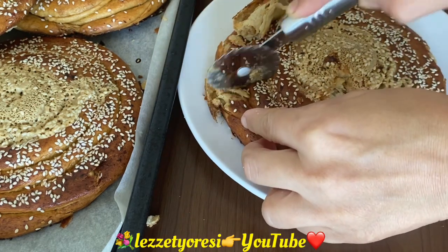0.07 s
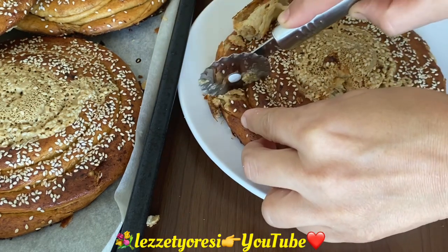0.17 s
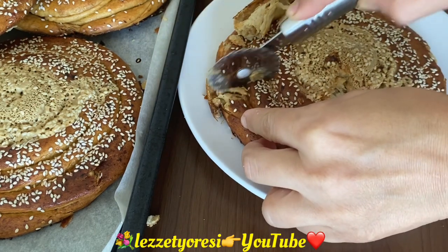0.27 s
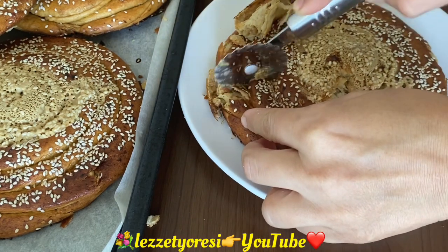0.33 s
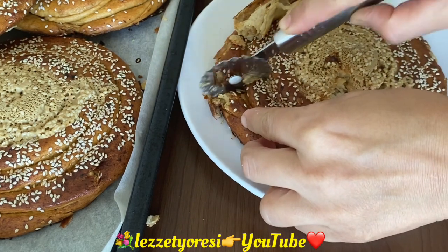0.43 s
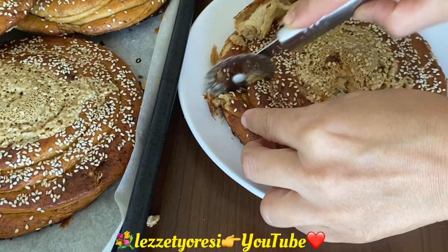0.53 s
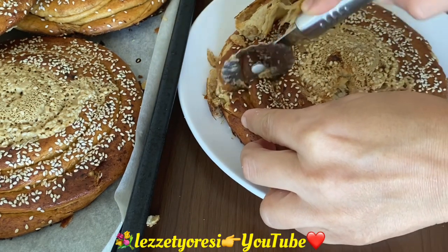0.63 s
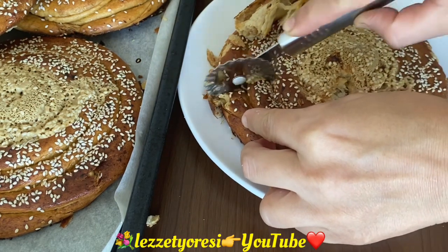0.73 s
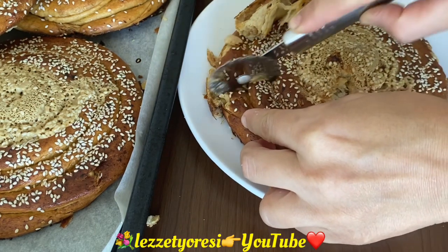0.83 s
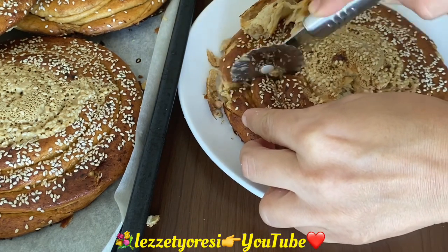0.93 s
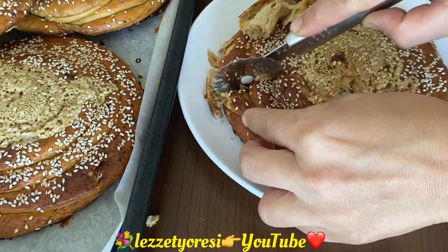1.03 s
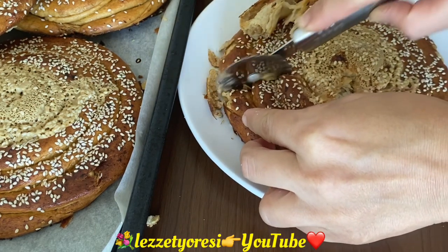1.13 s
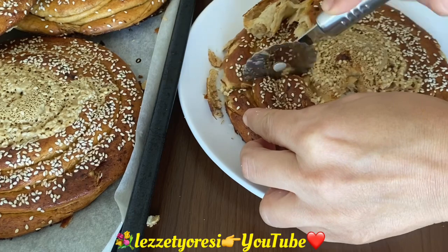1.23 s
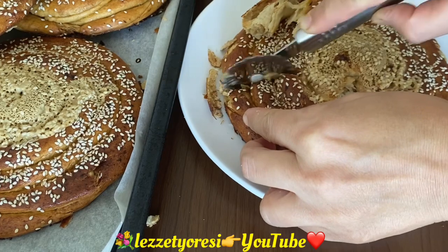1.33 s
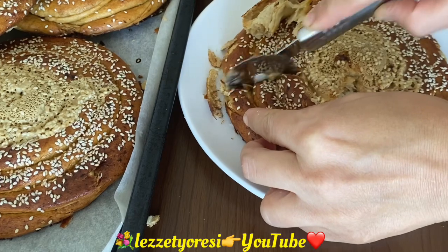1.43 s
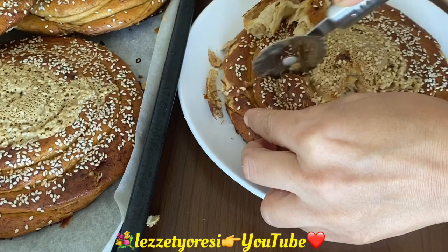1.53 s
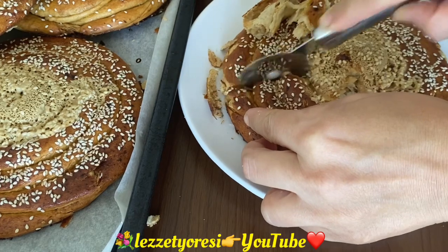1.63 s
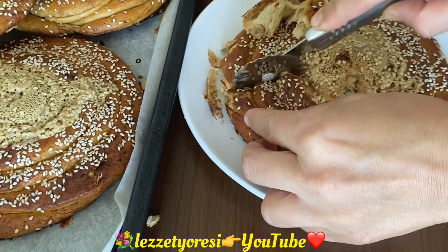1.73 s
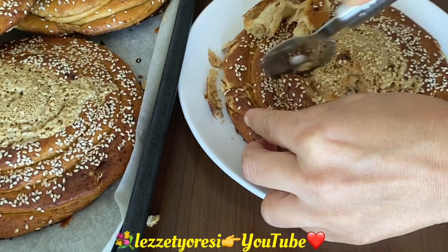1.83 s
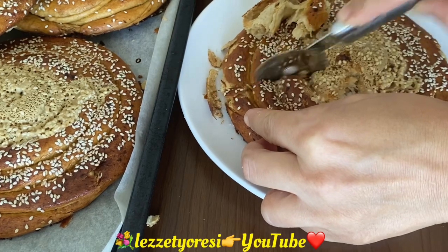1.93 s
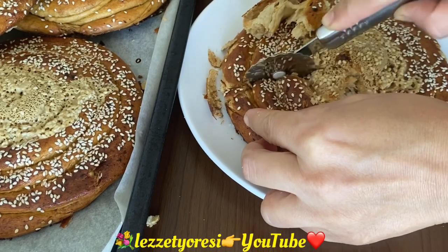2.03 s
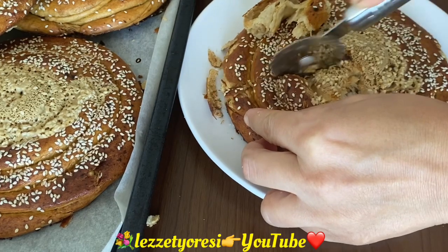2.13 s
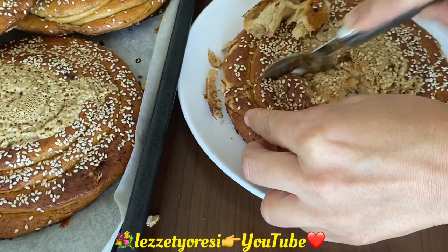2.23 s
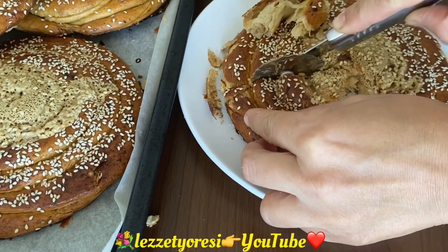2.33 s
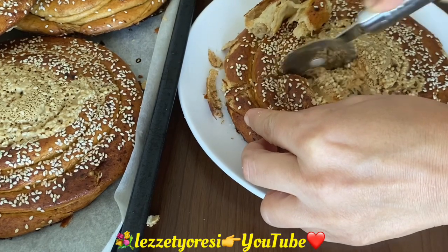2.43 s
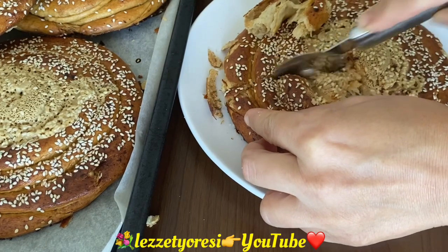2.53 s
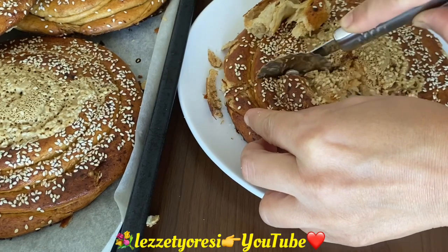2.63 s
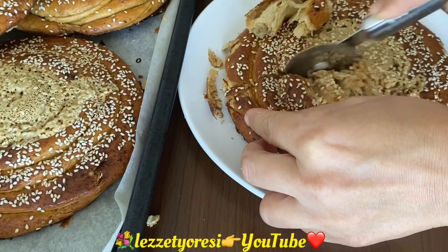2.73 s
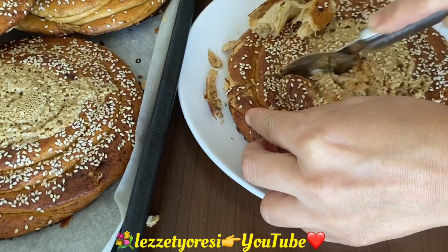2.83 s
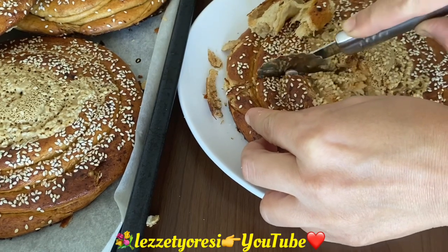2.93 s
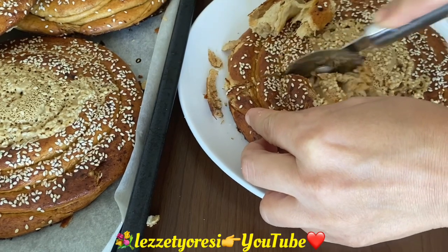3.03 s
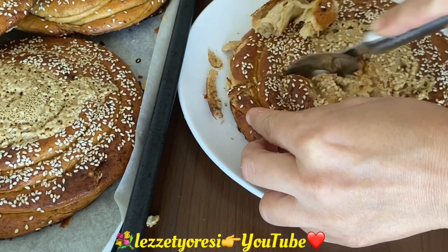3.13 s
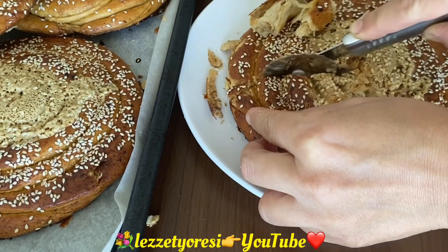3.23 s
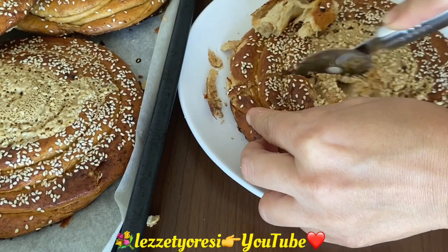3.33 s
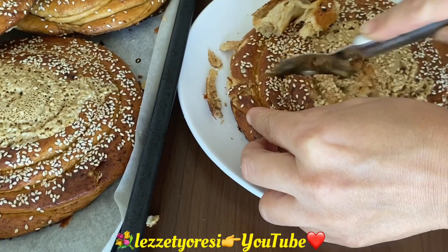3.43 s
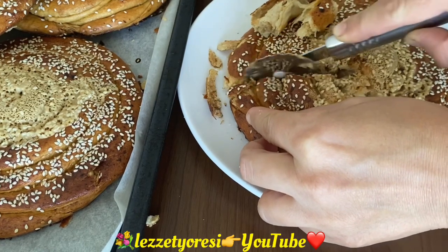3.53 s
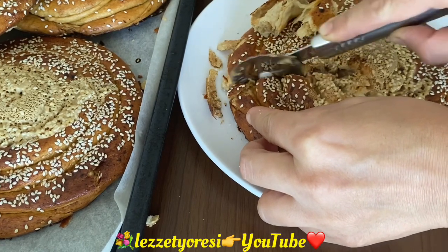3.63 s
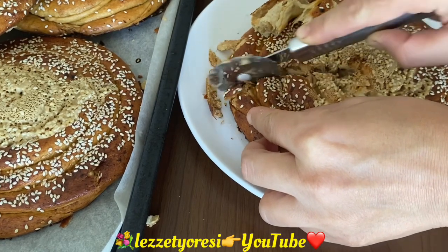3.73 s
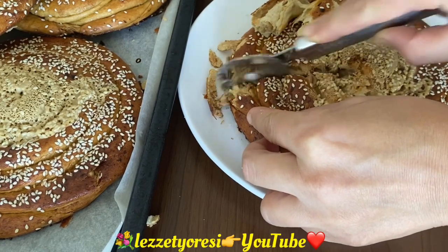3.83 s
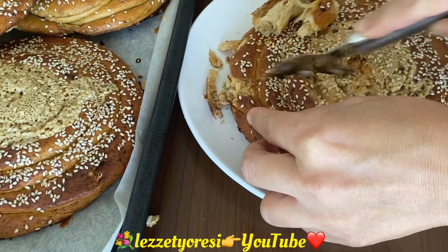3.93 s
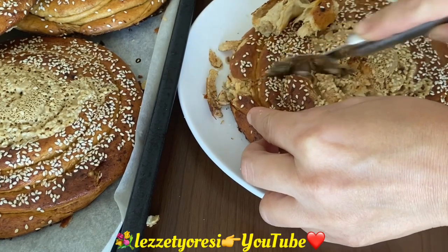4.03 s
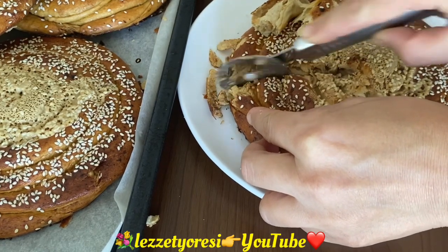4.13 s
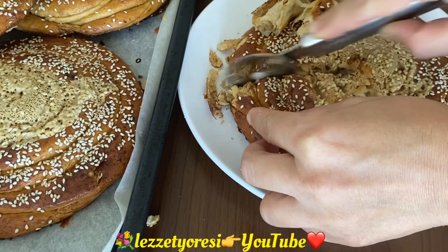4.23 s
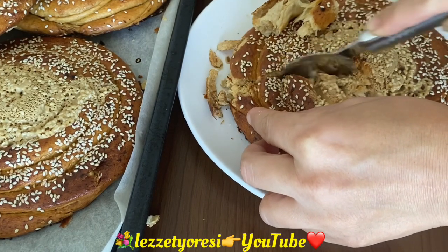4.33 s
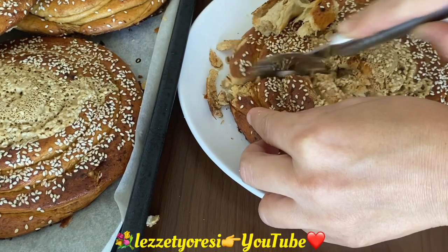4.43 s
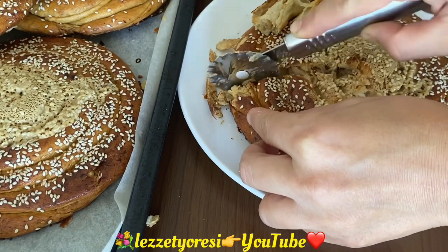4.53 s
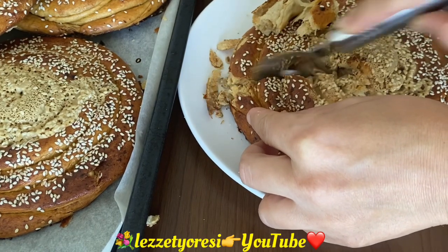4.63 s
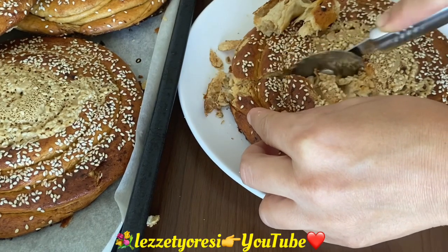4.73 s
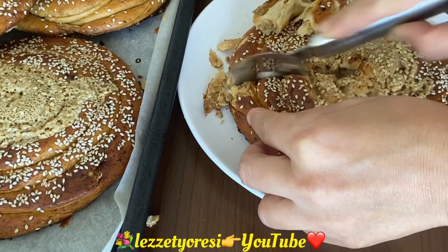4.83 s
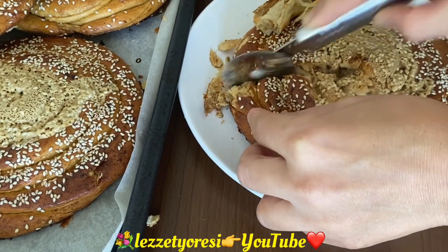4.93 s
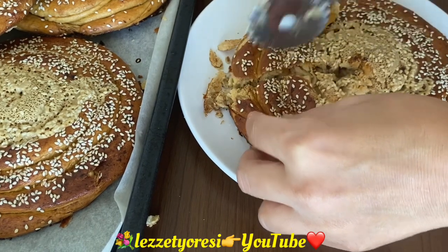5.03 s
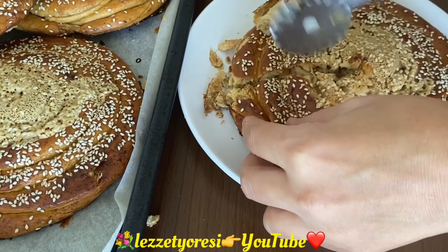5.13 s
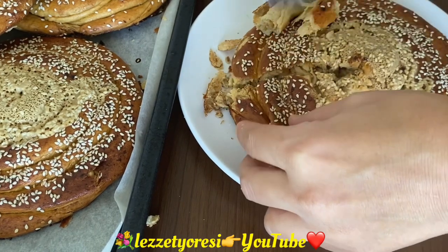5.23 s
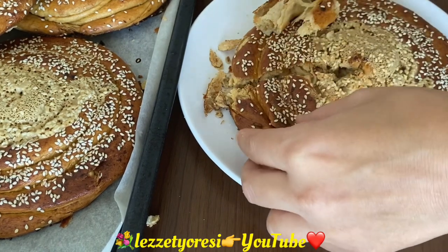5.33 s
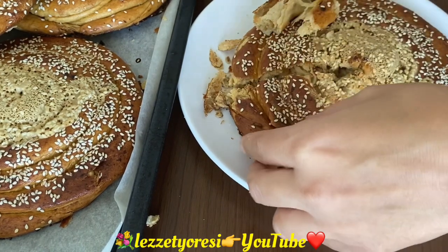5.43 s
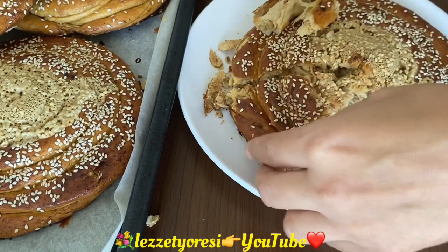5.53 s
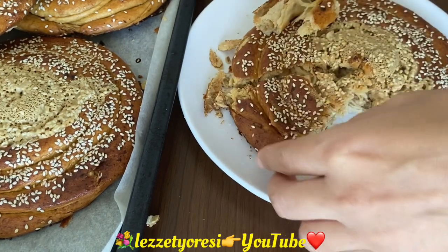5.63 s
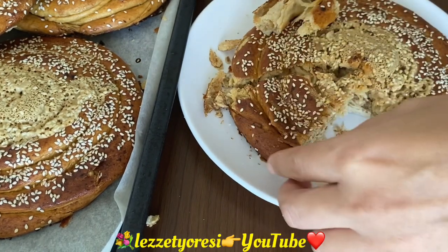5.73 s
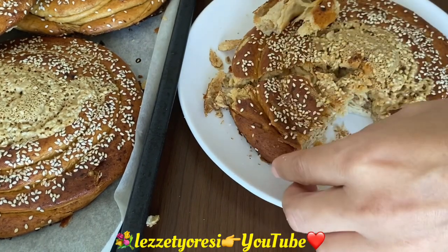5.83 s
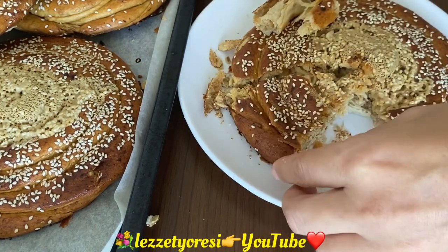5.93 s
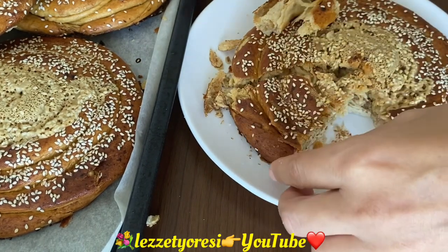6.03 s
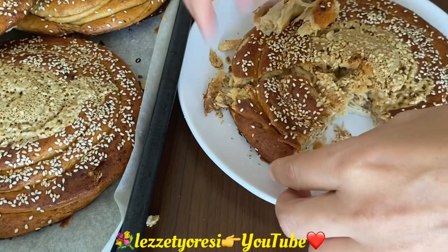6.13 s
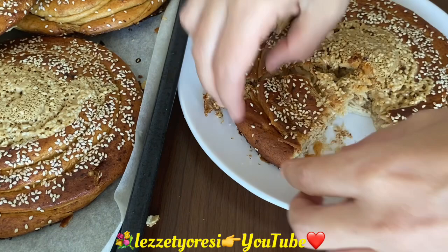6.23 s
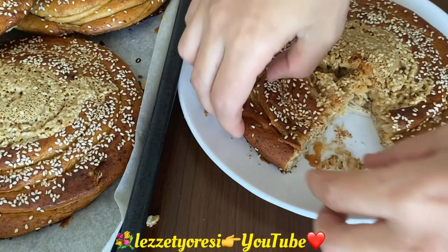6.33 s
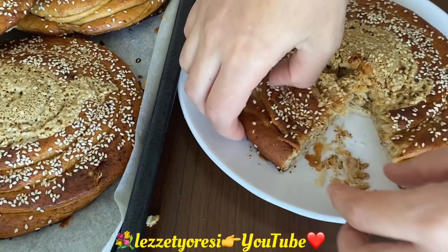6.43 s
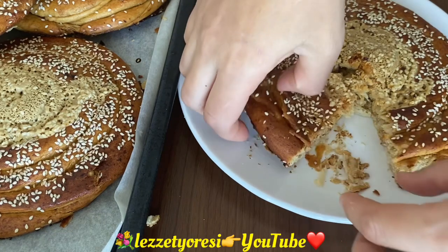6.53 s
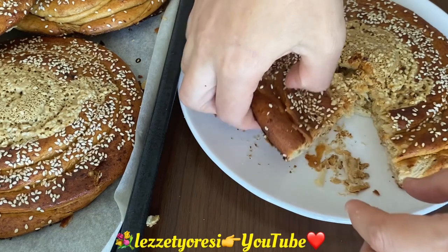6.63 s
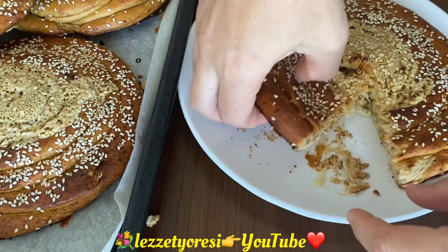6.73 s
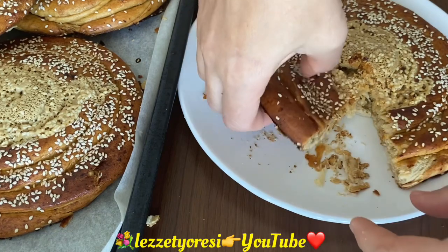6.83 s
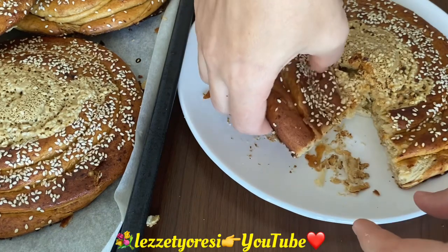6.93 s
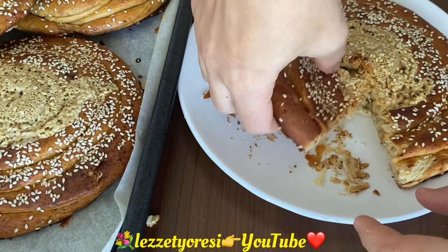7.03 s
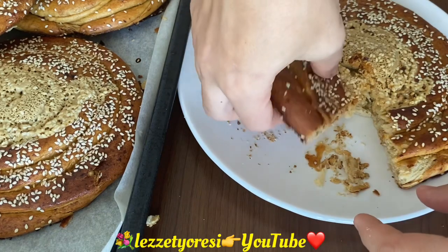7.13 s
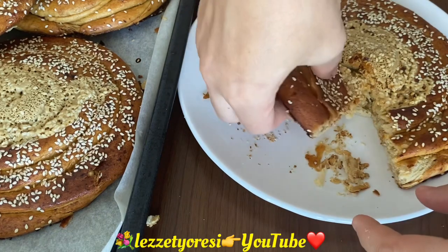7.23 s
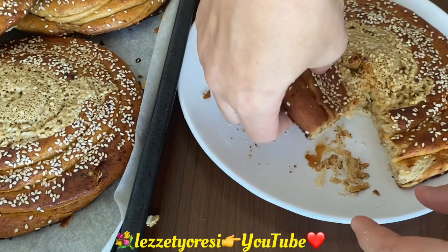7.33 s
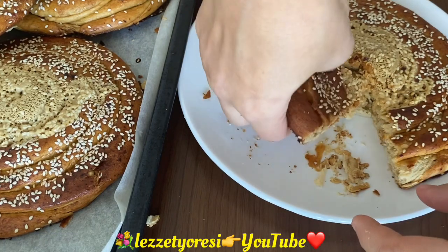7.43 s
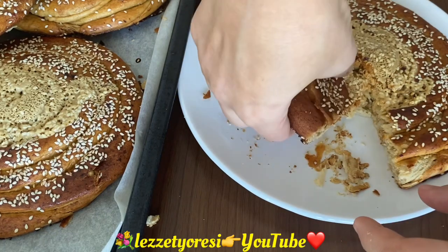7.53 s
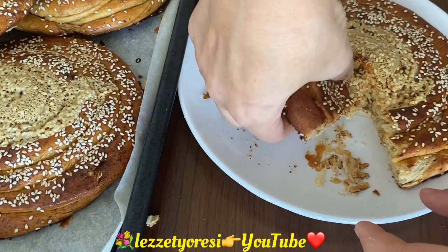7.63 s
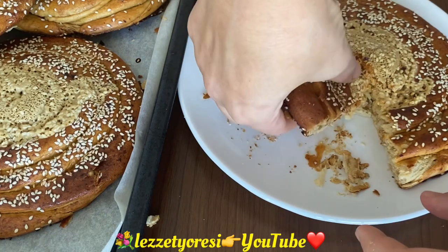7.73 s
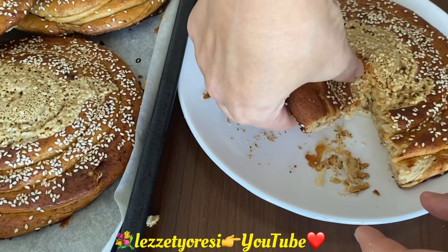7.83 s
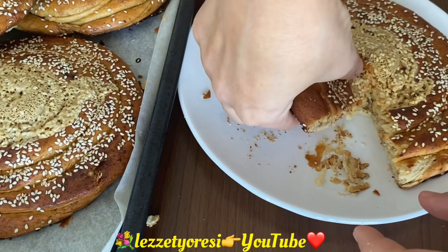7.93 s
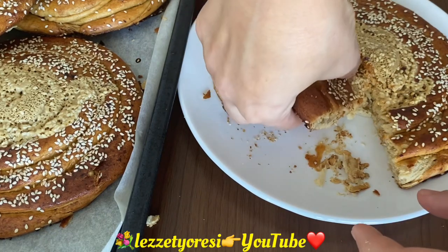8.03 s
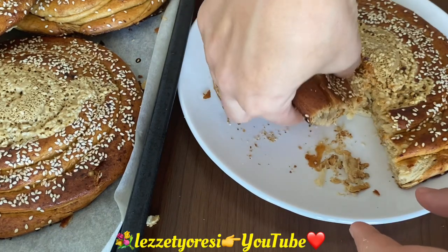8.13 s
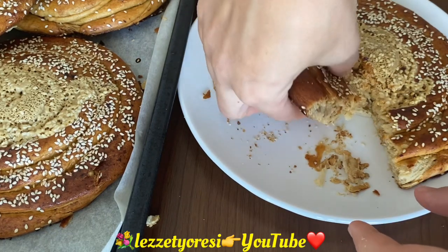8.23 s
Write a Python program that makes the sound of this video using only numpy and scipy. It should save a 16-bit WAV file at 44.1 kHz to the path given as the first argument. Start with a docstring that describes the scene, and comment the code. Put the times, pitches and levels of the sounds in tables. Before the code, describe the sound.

Close, brittle crunching as a steel cutter works through flaky baked crust on ceramic, ending with a heavy plate bump and tiny clinks.

```python
"""A steel cutting wheel saws through the crisp crust of a pastry on a ceramic plate and strikes the plate,
then is put down; the plate bumps the table and fingers lift a piece with small clinks.
Random breaks and short puffs of noise make the crust, and ring the resonances of plate and wheel.
Throughout, table thumps and a far rumble, beating hums and kitchen air lie behind the close sound,
at a pair of microphone ports."""
import sys
import numpy as np
from scipy import signal
from scipy.fft import rfft, irfft, next_fast_len
from scipy.io import wavfile
from scipy.ndimage import uniform_filter1d, map_coordinates

SR = 44100
rng = np.random.default_rng(int(sys.argv[2]) if len(sys.argv) > 2 else 0)


def store_pcm(level_fs):
    """Save levels as 16-bit WAV."""
    pcm = np.round(np.clip(level_fs, -1, 1) * 32767).astype(np.int16)
    wavfile.write(sys.argv[1], SR, np.atleast_2d(pcm).T)


N = 364701  # length [samples]

# modes of the plate on its table: (frequency [Hz], level [dB], t60 [s])
PLATE_MODES = [(330, 7.5, 0.034), (640, 3.5, 0.021), (797, 4, 0.03), (1312, 3, 0.024), (1510, -2.5, 0.027),
               (1743, 1, 0.084), (1933, -7, 0.028), (2680, -0.5, 0.024), (2940, -9.5, 0.013),
               (4640, -7, 0.022)]
# resonance of the steel disc: (frequency [Hz], width [Hz])
WHEEL_RESONANCE = (3650, 240)
# how much of the crackle rings on: (time [s], plate level [dB], wheel level [dB])
RINGING_LEVELS = [(0, -7.5, -71), (1.5, -10.5, -11.5), (2.75, -12, 1), (3, -0.5, -9), (4.2, -2, -9.5),
                  (4.9, 3.5, -12), (4.99, -13, -2.5), (5.85, 0, 1), (5.92, -7, -36), (6.9, -20.5, -25)]


def crust():
    """Dense breaking flakes are heard in the air, through plate and wheel, and as a low grinding."""
    # tilt of the flakes' spectrum: (frequency [Hz], level [dB per Hz])
    flake_spectrum = [(1500, -17.5), (2550, -9.5), (5750, -8.5), (7750, -3.5), (9900, 0), (10800, -56.5)]
    sizes = 6
    large = sizes // 2 + 1  # the first rows are the larger flakes
    sparkle_db, sparkle_fades = -5.5, 0.37  # smallest flakes over larger; dB lost per dB of plate ring
    low_modes_db = 9  # the plate's low modes over its high ones
    grind_s = 0.11  # the low grinding follows the strokes slowly

    stroke = crust_strokes()
    ring_db, wheel_db = curves(RINGING_LEVELS)
    breaks = grains(count=30000, spread_db=0.5, clump_db=3.0, kinds=sizes)
    pitch = np.geomspace(1500, 9300, sizes)[:, None]  # the smaller the flake, the higher it snaps [Hz]

    def flake_colour(f):
        tilt = amp(along(flake_spectrum, f)) * np.sqrt(3000 / pitch)
        return tilt * peak(f, pitch, 0.6 * pitch) ** 2

    flakes = filtered(breaks, flake_colour)
    sparkle = amp(sparkle_db - sparkle_fades * ring_db) * unit(flakes[large:].sum(0))
    crackle = unit(flakes[:large].sum(0)) + sparkle + unit(big_flakes(pitch))

    ring = unit(filtered(breaks[1] + breaks[0], lambda f: plate(f) * (f > 1900)))
    wheel = unit(filtered(breaks[2], lambda f: peak(f, *WHEEL_RESONANCE)))
    low_colour = lambda f: (plate(f) + 0.64 * peak(f, 970, 500)) * (f < 1900)
    crunch = unit(filtered(breaks[0], low_colour))

    slow_stroke = abs(uniform_filter1d(stroke, round(grind_s * SR)))
    grind = np.sqrt(stroke * slow_stroke)
    bright = crackle + amp(ring_db) * ring + amp(wheel_db) * wheel
    return stroke * bright + grind * amp(ring_db + low_modes_db) * crunch


def crust_strokes():
    """The crackle swells with wheel strokes and finger grips over steadily settling crumbs."""
    # strokes through the crust, and the piece dragged free: (peak time [s], crackle level [dB], fall [s])
    wheel_strokes = [(0.0, -59.5, 0.25), (0.147, -53.5, 0.08), (0.332, -60, 0.045), (0.431, -55.5, 0.13),
                     (0.612, -57.5, 0.13), (0.728, -52.5, 0.11), (0.915, -58, 0.31), (1.049, -53, 0.068),
                     (1.206, -59.5, 0.26), (1.381, -50, 0.039), (1.502, -57.5, 0.2), (1.669, -58, 0.17),
                     (1.867, -59, 0.058), (1.981, -57.5, 0.1), (2.156, -62, 0.2), (2.28, -54.5, 0.057),
                     (2.441, -64.5, 0.48), (2.563, -63, 0.18), (2.78, -61.5, 0.16), (2.947, -51, 0.038),
                     (3.047, -64.5, 0.28), (3.245, -49.5, 0.046), (3.328, -47.5, 0.022),
                     (3.518, -51.5, 0.065), (3.63, -61, 0.15), (3.724, -63, 0.3), (3.931, -52, 0.14),
                     (4.139, -52.5, 0.11), (4.312, -61, 0.22), (4.44, -62, 0.15), (4.531, -53, 0.069),
                     (4.641, -58.5, 0.22), (4.872, -53, 0.096), (5.205, -69.5, 0.23), (5.771, -67.5, 0.41),
                     (5.93, -57.5, 0.31)]
    # grips of the fingers on the piece: (peak time [s], crackle level [dB], fall [s])
    finger_grips = [(6.67, -73.5, 0.075), (6.739, -71.5, 0.036), (6.785, -69.5, 0.027), (6.912, -70, 0.066),
                    (7.135, -66, 0.074), (7.35, -78, 0.08), (7.69, -88, 0.073), (7.875, -87, 0.038),
                    (7.95, -86, 0.084)]
    settle_db = -91
    strokes = swells(wheel_strokes, rise_s=0.077, abrupt=0.05)
    return strokes + swells(finger_grips, rise_s=0.026) + amp(settle_db)


def big_flakes(pitch):
    """The few big flakes each make a short noise burst of their own colour."""
    burst_t60 = 0.007  # [s]
    ticks = grains(count=2200, spread_db=3, clump_db=2.5, kinds=len(pitch))
    decay = amp(-60 / burst_t60 / SR)
    envelope = signal.lfilter([1], [1, -decay], abs(ticks))
    bursts = envelope * rng.standard_normal(ticks.shape)
    return filtered(bursts, lambda f: peak(f, pitch, 0.6 * pitch) ** 3).sum(0)


def snaps():
    """Each crack is a short puff: a body that rings the nearby modes, a treble spit and a low-mode knock."""
    # single cracks and contacts; treble and knock are relative to the body:
    # (time [s], peak level [dB], body [Hz], treble level [dB], knock level [dB])
    cracks = [(0.1165, -43.5, 3080, 7, -2), (0.1503, -41.5, 2210, 0, -17), (0.409, -40, 1290, 7.5, -25),
              (0.428, -33, 1160, -4.5, -22), (0.4338, -30.5, 1914, -2, -3.5), (0.445, -41, 3300, -4, -30),
              (0.696, -44, 2900, -12, -18), (1.3482, -38, 3130, -18, -3), (1.6602, -34, 3270, -1, -6),
              (1.679, -38, 3400, 0.5, -17), (1.829, -42.5, 3440, -5, -25), (1.9708, -31.5, 3200, 8.5, -7.5),
              (1.9909, -35, 2420, -6, -31), (2.2409, -40.5, 1110, -4.5, -8), (2.4456, -41, 3670, -8, -2.5),
              (2.606, -38.5, 2400, -10.5, -5), (2.914, -41.5, 1530, -18, 4.5),
              (3.032, -39.5, 1440, -4.5, -13), (3.203, -48, 1470, -18, 10.5), (3.2397, -33, 2240, -2.5, -6),
              (3.46, -30.5, 2400, -7.5, 2.5), (3.496, -26, 2270, -8, -14), (3.9797, -29, 1580, -45, -3.5),
              (4.0822, -26, 2590, -12, -6.5), (4.2721, -33.5, 1870, -39, -1), (4.348, -36, 2770, -10, -6),
              (4.373, -36.5, 1532, -23, -3), (4.393, -27.5, 2660, -7, -5), (4.4341, -32, 2540, -3, -3.5),
              (4.461, -32.5, 1596, -21.5, -23), (4.482, -27.5, 2840, -13.5, -3.5),
              (4.5365, -29, 2640, -21, -33), (4.556, -30, 2730, -28.5, -1.5),
              (4.628, -21, 2945, -14.5, -7.5), (4.819, -39, 2760, -10, -0.5), (4.8561, -31.5, 2665, -25, 0),
              (4.876, -34, 2670, -25, 4), (4.9125, -33, 2630, -25.5, -14),
              (4.94, -40.5, 4540, -11.5, -30.5), (4.991, -40, 3670, -8.5, -30.5),
              (4.9992, -20.5, 2880, -9, -19), (5.143, -33.5, 2220, -4, -25), (5.1921, -30, 2134, 10, -18.5),
              (5.4332, -51, 3300, -20, -23.5), (5.4825, -38, 3290, -31, -18),
              (5.761, -35, 3285, -30.5, -8.5), (5.9379, -27, 4610, 6, -27), (6.118, -45, 3370, -2.5, -28.5),
              (6.76, -45.5, 362, -43.5, -11)]
    echo_s, echo = 0.00187, 0.6  # each crack comes again off the nearest hard surface
    # each crack rings the modes at new levels and slightly other pitches
    scatter_db, pitch_scatter = 4, 0.012

    out, t = np.zeros(N + SR), np.arange(SR // 4) / SR
    top = lambda x: x / abs(x).max()
    ring_db, wheel_db = curves(RINGING_LEVELS)
    for s, db, hz, treble_db, knock_db in cracks:
        at = round(s * SR)
        blow, spit = rng.standard_normal((2, len(t))) * amp(-60 * t / [[0.006], [0.012]])
        blow[0] = 5  # the break itself is one sharp push
        blow[round(echo_s * SR)] += echo * blow[0]

        chance = rng.standard_normal((2, len(PLATE_MODES), 1))
        shift = 1 + pitch_scatter * chance[1]
        struck = lambda f: modes(f, PLATE_MODES, scatter_db * chance[0], shift)
        nearby = lambda f: peak(f, 1.24 * hz, 0.78 * hz) * struck(f) * (f > 0.7 * hz)

        puff = filtered(blow, lambda f: peak(f, hz, 0.57 * hz) ** 2)
        ring = filtered(blow, nearby)
        wheel = filtered(puff, lambda f: peak(f, *WHEEL_RESONANCE))
        treble = filtered(spit, lambda f: peak(f, 6850, 4800) ** 2)
        knock = filtered(blow, lambda f: struck(f) * peak(f, 838, 1700) ** 2)

        body = top(puff) + amp(-2.5 + 1.3 * ring_db[at]) * top(ring)
        body = body + amp(wheel_db[at] - 8.0) * top(wheel)
        sound = top(body) + amp(treble_db) * top(treble) + amp(knock_db) * top(knock)
        out[at:][:len(t)] += amp(db) * sound
    return out[:N]


def plate(f):
    """The plate at rest answers with the sum of its modes."""
    return modes(f, PLATE_MODES)


def bump():
    """The tipped plate bumps the table: one heavy contact and its rebound ring the table top."""
    # modes of the table top under the plate's rim: (frequency [Hz], level [dB], t60 [s])
    rim_modes = [(358, 18, 0.089), (623, -7.5, 0.053), (919, 2, 0.032), (1430, 1, 0.011), (1860, -1, 0.014),
                 (3000, -15.5, 0.017)]
    bump_s, bump_db = 5.9208, -11
    push_t60 = 0.0012  # [s]
    rebound_s, rebound = 0.0014, 1.7  # the rim lands a second time, harder

    out, t = np.zeros(N), np.arange(SR // 4) / SR
    push = 0.3 * rng.standard_normal(len(t)) * amp(-60 * t / push_t60)
    push[[0, round(rebound_s * SR)]] = 1, rebound
    knock = filtered(push, lambda f: modes(f, rim_modes) * peak(f, 1700, 4100))
    out[round(bump_s * SR):][:len(t)] = amp(bump_db) * knock / abs(knock).max()
    return out


def pings():
    """A thin decaying tone rings on after an early crack, perhaps the wheel's handle."""
    # onsets: (time [s], level [dB])
    ping_hits = [(0.148, -45.5)]
    # the tone: (frequency [Hz], level [dB], t60 [s])
    ping_modes = [(1665, 0, .17)]
    return tones(ping_hits, ping_modes)


def clinks():
    """The plate clinks under the lifted piece, as short pairs of decaying tones."""
    # onsets: (time [s], level [dB])
    clink_hits = [(6.785, -54), (7.166, -52.5), (7.187, -57)]
    # the tones: (frequency [Hz], level [dB], t60 [s])
    clink_modes = [(2700, -2.5, 0.025), (4330, -4, 0.02)]
    return tones(clink_hits, clink_modes)


def tones(hits, rows):
    """A few lightly damped modes ring softly and a little unsteadily at every hit."""
    rise_s = 0.00081
    out, t = np.zeros(N), np.arange(SR // 2) / SR
    for s, db in hits:
        ring = np.zeros(len(t))
        for hz, level, t60 in rows:
            phase = 2 * np.pi * hz * t + 1.5 * wobble(250)[:len(t)]
            ring += amp(level - 60 * t / t60) * np.sin(phase)
        out[round(s * SR):][:len(t)] += amp(db) * ring * (1 - np.exp(-t / rise_s))
    return out


def kitchen(x):
    """Each frequency of the room's answer dies at its own speed in a tail of noise."""
    # decay of the room: (frequency [Hz], t60 [s])
    room_decay = [(150, 0.34), (1000, 0.48), (3000, 0.58), (9000, 0.31)]
    # colour of the room: (frequency [Hz], level [dB])
    room_colour = [(150, 4), (500, 2), (1200, -5), (2500, -10), (9000, -15.5)]
    hz, t, z = signal.stft(rng.standard_normal((2, SR // 2)), SR, nperseg=256)
    fading = z * amp(-60 * t / along(room_decay, hz)[:, None])
    tail = signal.istft(fading, SR, nperseg=256)[1]
    tail = tail / np.linalg.norm(tail[0])
    wet = filtered(x, lambda f: amp(along(room_colour, f)))
    late = np.pad(wet, (200, 0))  # the room answers 200 samples late
    return signal.fftconvolve(late[None], tail, axes=1)[:, :N]


def table():
    """Each push starts the table top's lowest mode softly; a far rumble of filtered noise comes and goes."""
    # pushes that shake the table top: (time [s], level [dB])
    thumps = [(0.74, -39.5), (1.679, -37), (1.968, -42.5), (2.909, -41.5), (3.234, -38), (3.464, -37),
              (3.975, -41), (4.133, -41.5), (4.492, -43.5), (4.823, -33.5), (5.926, -36.5)]
    # lowest mode of the table top, detuned a little by each push: (frequency [Hz], t60 [s])
    hz, t60 = (130, .75)
    # band of the rumble: (frequency [Hz], width [Hz])
    rumble_band = (59.8, 26)
    # course of the rumble: (time [s], level [dB])
    rumble_levels = [(0, -53), (1.47, -51), (1.77, -59), (1.95, -48), (2.23, -54.5), (4.84, -57.5),
                     (5.69, -64), (7.85, -62.5), (8.04, -48), (8.27, -64)]

    out, t = np.zeros(N + SR), np.arange(SR) / SR
    for s, db in thumps:
        detuned = hz * (1 + rng.normal(0, 0.01))
        ring = np.sin(2 * np.pi * (detuned * t + rng.random()))
        soft_start = 1 - np.exp(-t / 0.016)
        out[round(s * SR):][:SR] += amp(db - 60 * t / t60) * soft_start * ring
    rumble = unit(filtered(rng.standard_normal(N), lambda f: peak(f, *rumble_band) ** 2))
    return out[:N] + amp(curves(rumble_levels)[0]) * rumble


def hum():
    """An appliance's mains and rotor hums beat slowly against each other under a faint higher tone."""
    mains_hz, motor_hz = 100, 98.62  # twice the mains and twice the slipping rotor
    beat_s = 1.23  # a moment at which the two hums oppose each other
    # RMS levels: (mains [dB], rotor [dB])
    mains_db, motor_db = (-52.5, -58.5)
    # the higher tone, its level wavering: (frequency [Hz], RMS level [dB])
    whine_hz, whine_db = (210.5, -62)

    turn = 2 * np.pi * (np.arange(N) / SR - beat_s)
    beat = amp(mains_db) * np.sin(mains_hz * turn) - amp(motor_db) * np.sin(motor_hz * turn)
    whine = amp(whine_db + 1.5 * wobble(3.4)) * np.sin(whine_hz * turn)
    return np.sqrt(2) * (beat + whine)


def air():
    """Steady filtered noise is the room's air, most alike at both ports in the bass."""
    # relative spectrum of the kitchen air: (frequency [Hz], level [dB per Hz])
    air_spectrum = [(20, -18), (45, -18), (125, -3), (152, -7.5), (216, -9), (430, -18), (770, -17),
                    (1280, -23.5), (2350, -40.5), (4000, -57), (10800, -67)]
    # how alike left and right are, held within -1 to 1: (frequency [Hz], likeness)
    likeness = [(60, 0.95), (260, 0.71), (550, -0.073), (1140, -0.2), (2380, 0.46), (4980, 0.66),
                (10400, -1.8)]
    air_db = -53

    def mid_side(f):
        turn = np.arccos(np.clip(along(likeness, f), -1, 1)) / 2
        return amp(along(air_spectrum, f)) * [np.cos(turn), np.sin(turn)]

    mid, side = filtered(rng.standard_normal((2, N)), mid_side)
    return amp(air_db) * unit(np.array([mid + side, mid - side]))


def grains(count, spread_db, clump_db, kinds):
    """Tiny breaks at random moments, a few much bigger, come in clumps; one row for each kind."""
    draw = rng.random((count, 4))
    size_db = np.minimum(-spread_db * np.log(1 - draw[:, 1]), 19)
    size = amp(size_db) * np.sign(draw[:, 2] - 0.5)
    kind = (draw[:, 3] * kinds).astype(int)
    place = kind * N + (draw[:, 0] * N).astype(int)
    rows = np.bincount(place, size, kinds * N).reshape(kinds, N)
    clumps = wobble(55) + 1.2 * np.array([wobble(35) for _ in rows])  # shared and own clumping
    return unit(rows * amp(clump_db * clumps))


def swells(rows, rise_s, abrupt=0):
    """Each row swells to its peak, sooner if strong, and falls to nothing; the strongest one rules."""
    firm_db = -56.5  # a swell of this level takes rise_s; abrupt is dB of rise time lost per dB above it
    s, db, fall_s = np.transpose(rows)[:, :, None]
    t = np.arange(0, N + 64, 64) / SR
    rise = 1 + (t - s) / (rise_s * amp(-abrupt * (db - firm_db)))
    fall = 1 - (t - s) / fall_s
    shape = np.clip(np.minimum(rise, fall), 0, 1) ** 2
    return np.interp(np.arange(N) / SR, t, (amp(db) * shape).max(0))


def modes(f, rows, change_db=0, shift=1):
    """A table of modes, of alternating sign, as one response."""
    hz, db, t60 = np.transpose(rows)[:, :, None]
    sign = (-1.) ** np.arange(len(rows))[:, None]
    width = np.log(1000) / np.pi / t60
    return (sign * amp(db + change_db) * peak(f, hz * shift, width)).sum(0)


def peak(f, hz, width):
    """One causal resonance of top gain 1."""
    return 1j * f * width / (hz * hz - f * f + 1j * f * width)


def filtered(x, response):
    """x times a complex response of frequency."""
    m = next_fast_len(x.shape[-1] + SR // 4)
    spectrum = rfft(x, m) * response(np.fft.rfftfreq(m, 1 / SR))
    return irfft(spectrum, m)[..., :x.shape[-1]]


def wobble(rate):
    """A smooth random curve, rate knots a second."""
    knots = rng.standard_normal(int(N * rate / SR) + 4)
    return map_coordinates(knots, [np.arange(N) * rate / SR])


def curves(rows):
    """One value per sample for each column after the time."""
    s, *cols = np.transpose(rows)
    return [np.interp(np.arange(N) / SR, s, c) for c in cols]


def along(points, hz):
    """(Hz, value) points joined on a log frequency axis."""
    f, v = np.transpose(points)
    return np.interp(np.log(hz + 1), np.log(f + 1), v)


def unit(x):
    """x scaled to an RMS of 1."""
    return x / np.sqrt(np.mean(x ** 2) + 1e-20)


def amp(db):
    """Decibels to amplitude."""
    return 10 ** (np.asarray(db) / 20)


def scene():
    """Close sounds reach the two ports with level and phase differences, over room and background."""
    # the plate at the left port over the right: (frequency [Hz], level [dB])
    near_left = [(250, -5), (1000, 2.5), (3000, 1.5), (8000, -0.5)]
    # phase by which the left port leads: (frequency [Hz], lead [radians])
    left_lead = [(100, -2), (1900, 0.46), (6000, 0.93), (7300, 0), (8600, -2.5)]
    left_db = 0.5  # left channel over right, for everything

    def ports(f):
        half = amp(along(near_left, f) / 2) * np.exp(0.5j * along(left_lead, f))
        return half ** np.array([[1], [-1]])

    near = crust() + snaps() + bump() + pings() + clinks()
    total = filtered(near[None], ports) + kitchen(near) + table() + hum() + air()
    return total * amp([[left_db / 2], [-left_db / 2]])


def record(dry):
    """The recorder keeps nothing above its band limit."""
    top_hz = 10800
    return filtered(dry, lambda f: f < top_hz)


dry = scene()
out = record(dry)
store_pcm(out)
```